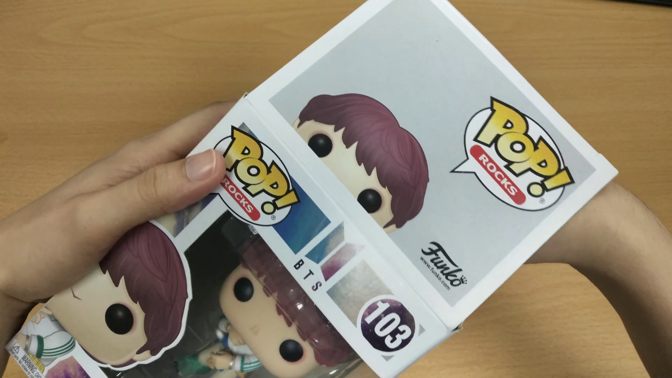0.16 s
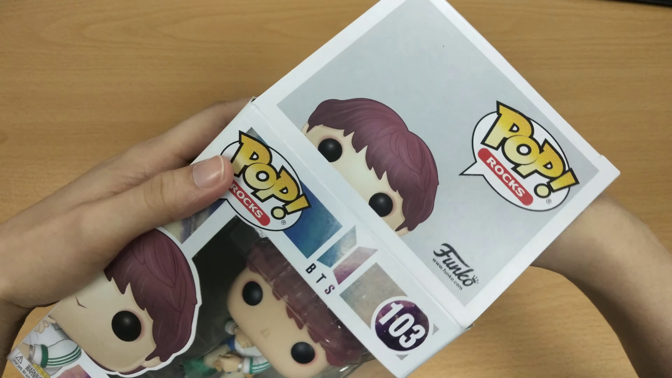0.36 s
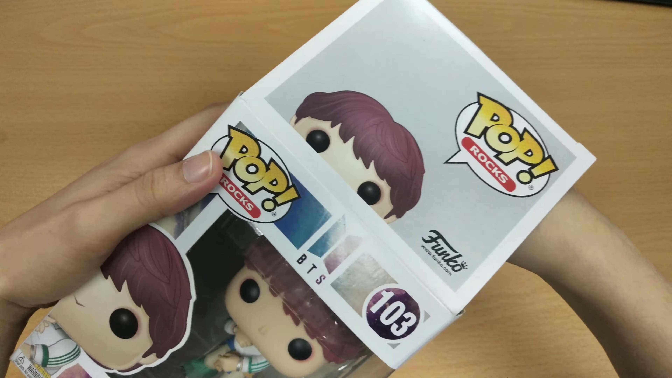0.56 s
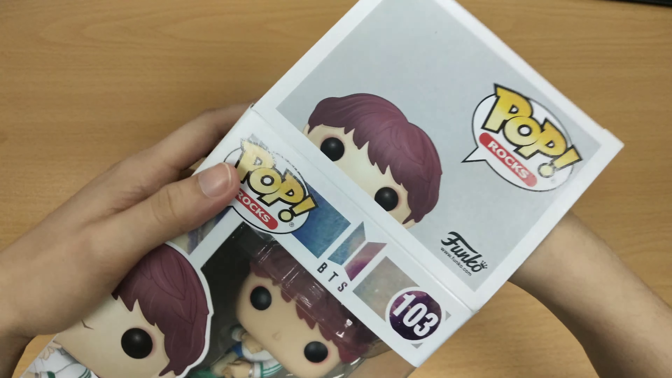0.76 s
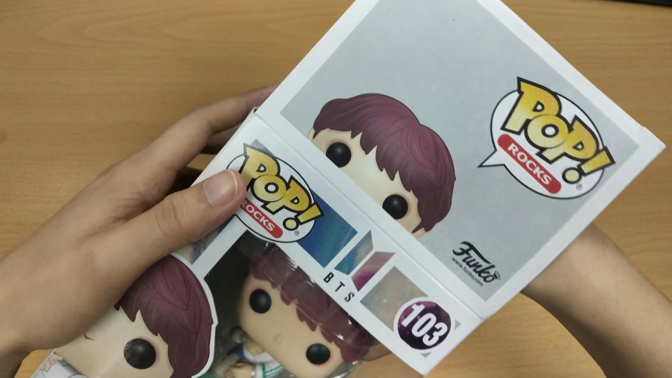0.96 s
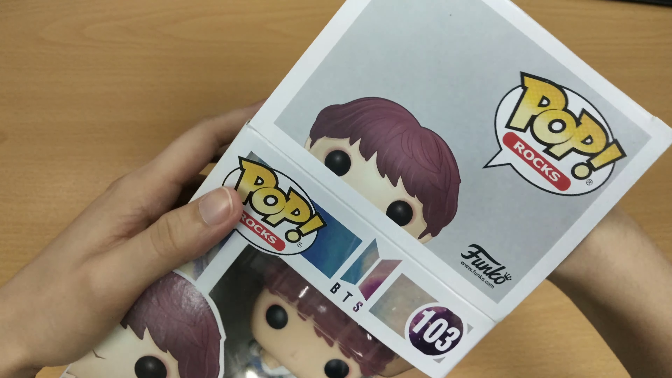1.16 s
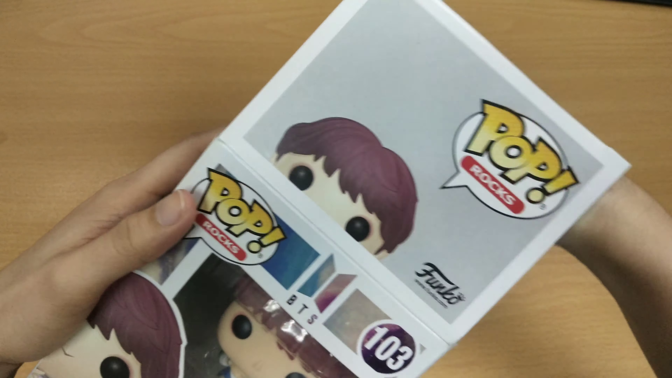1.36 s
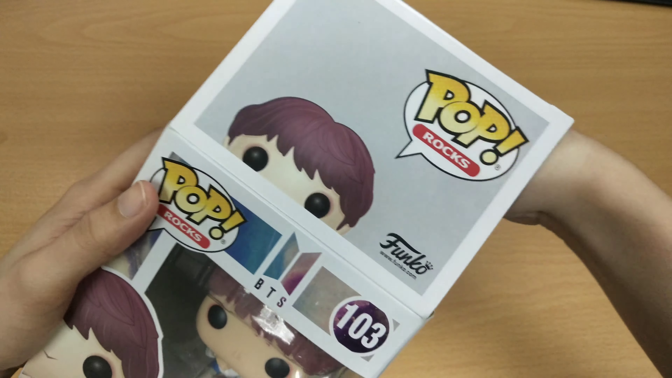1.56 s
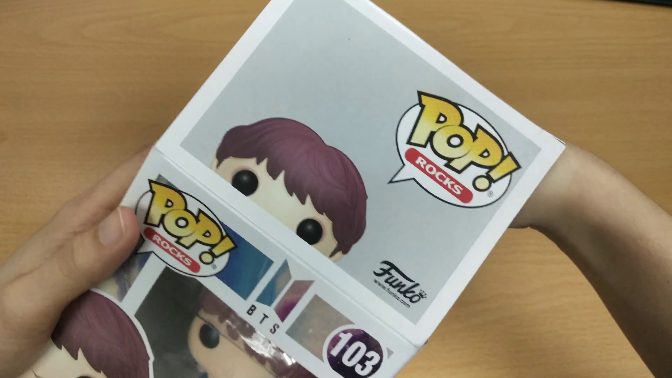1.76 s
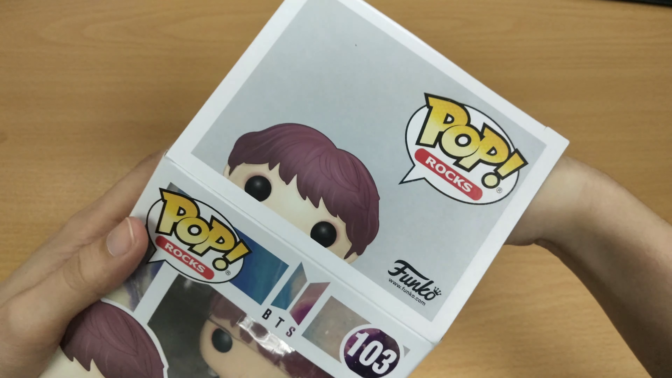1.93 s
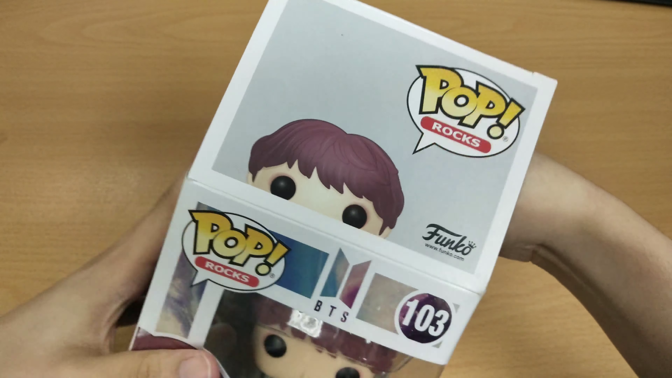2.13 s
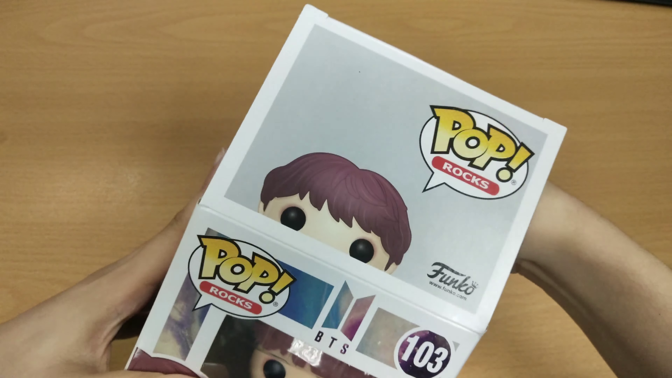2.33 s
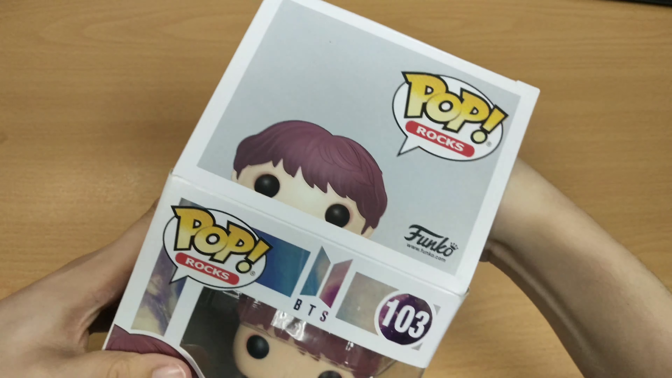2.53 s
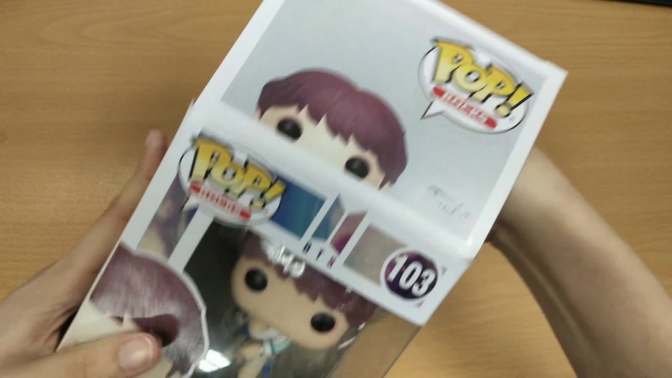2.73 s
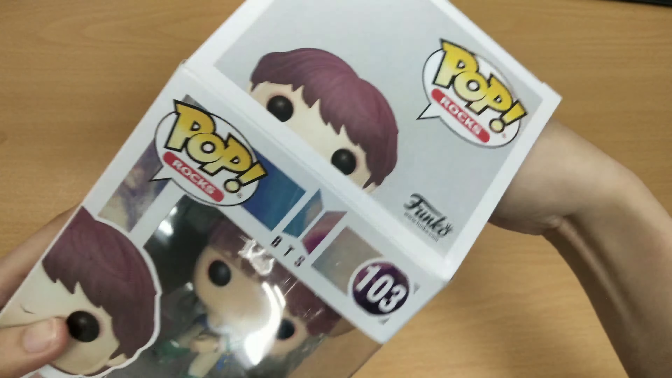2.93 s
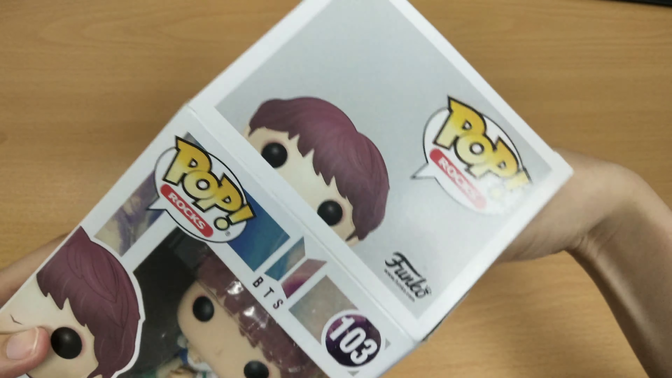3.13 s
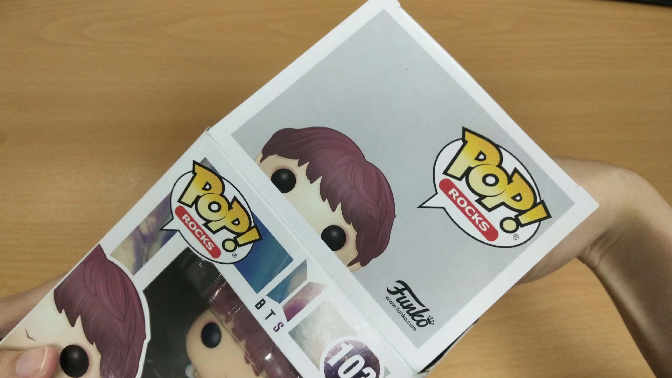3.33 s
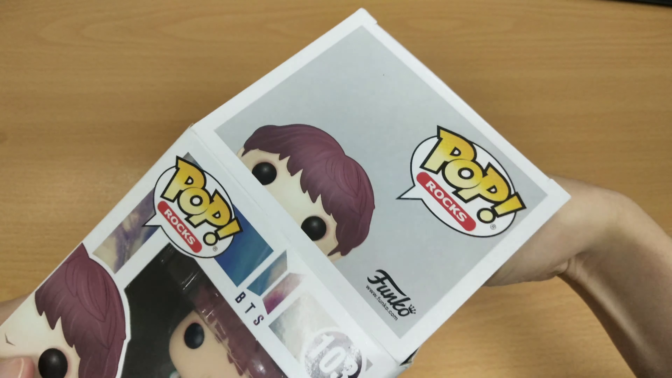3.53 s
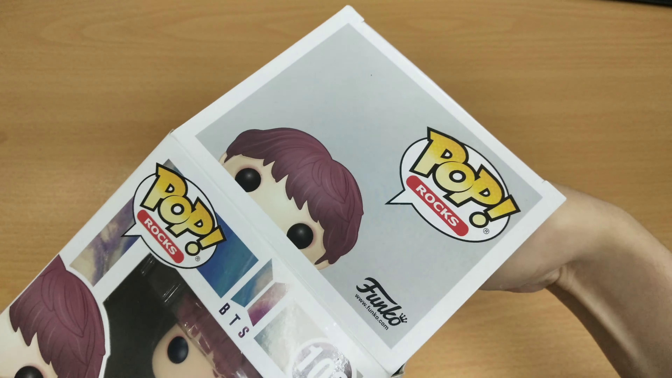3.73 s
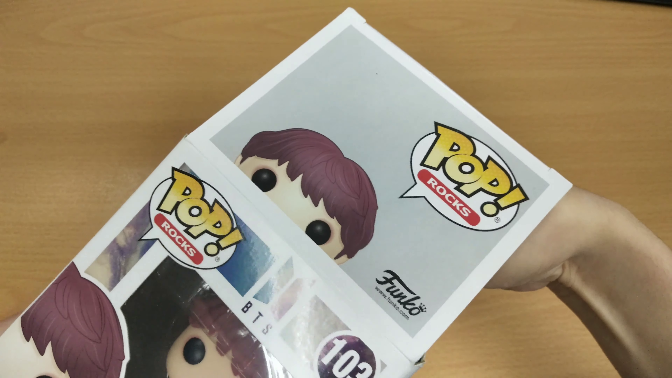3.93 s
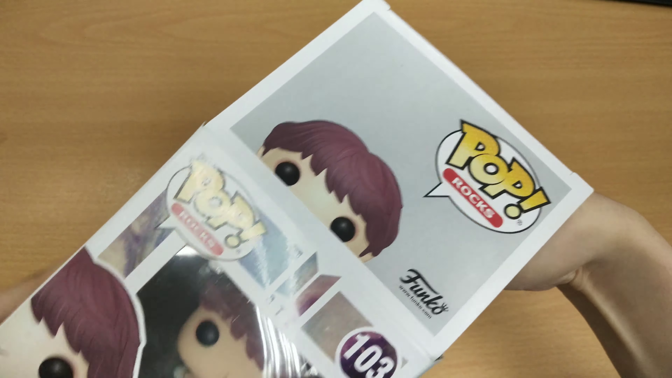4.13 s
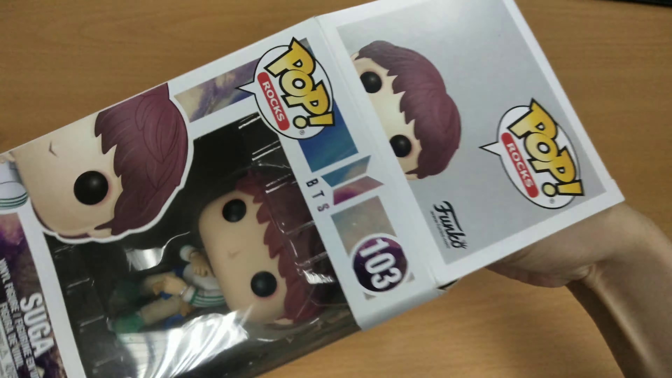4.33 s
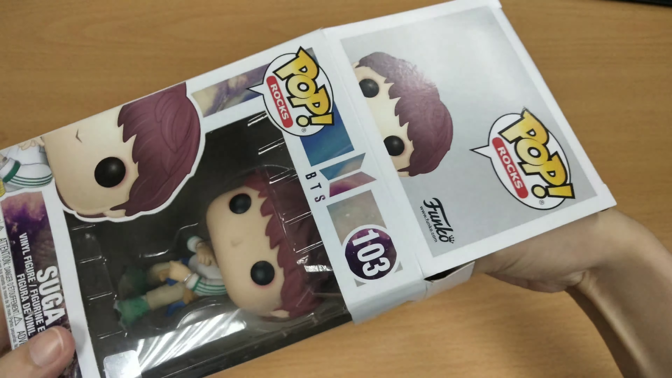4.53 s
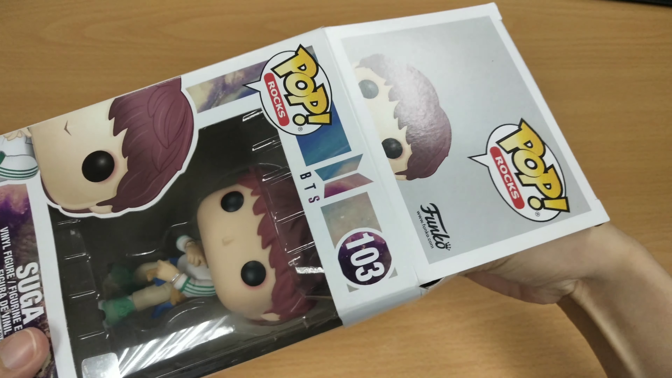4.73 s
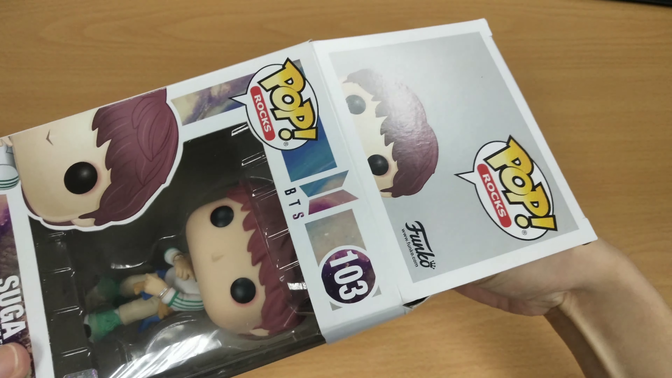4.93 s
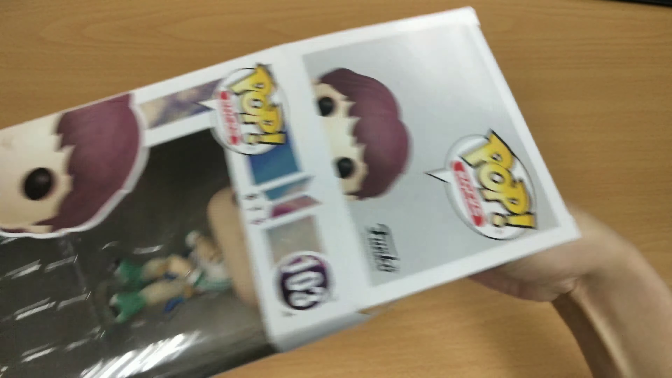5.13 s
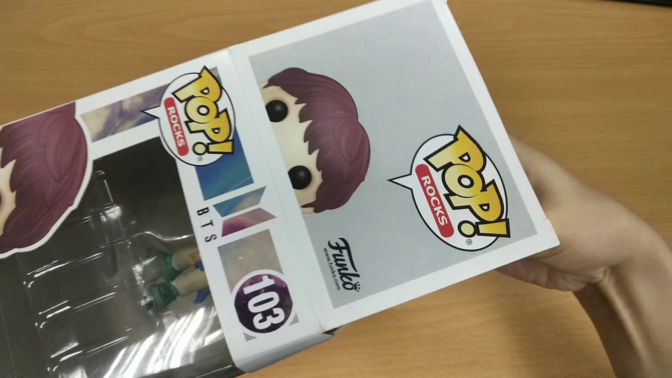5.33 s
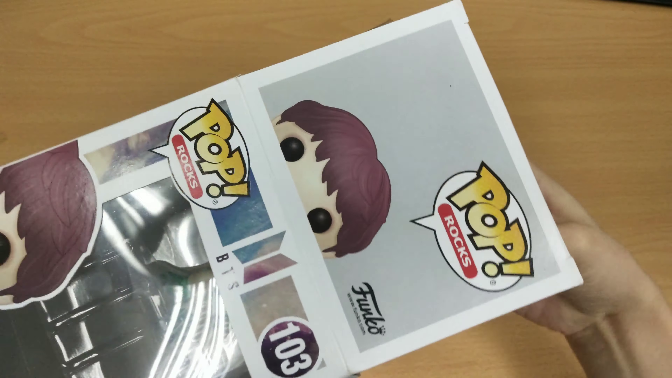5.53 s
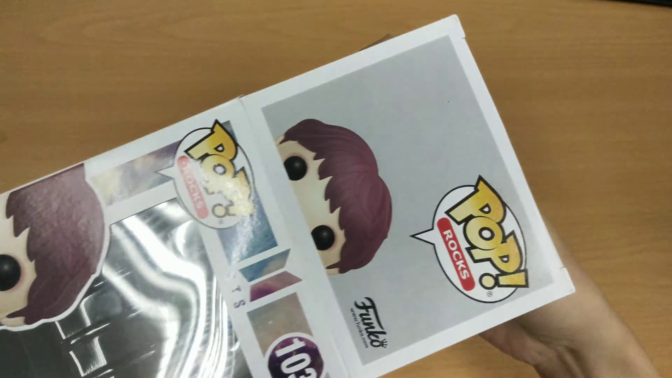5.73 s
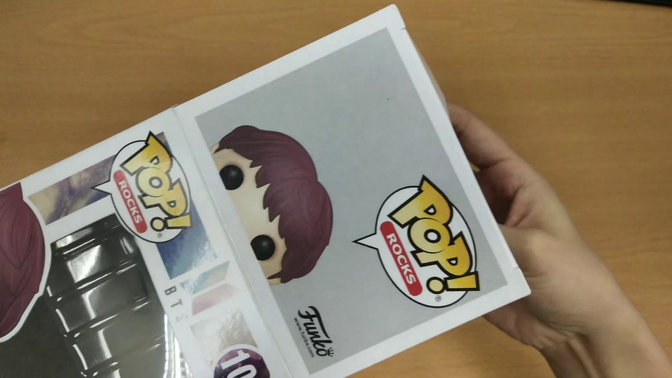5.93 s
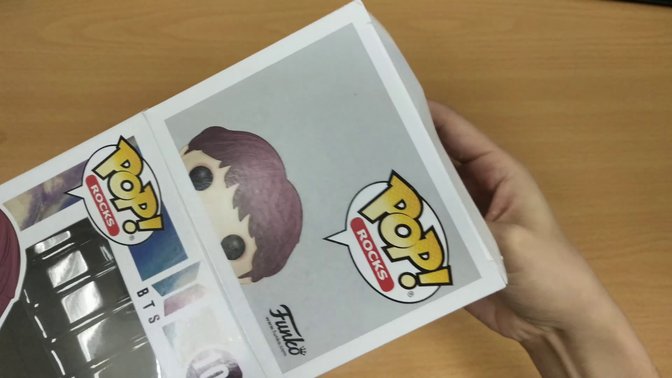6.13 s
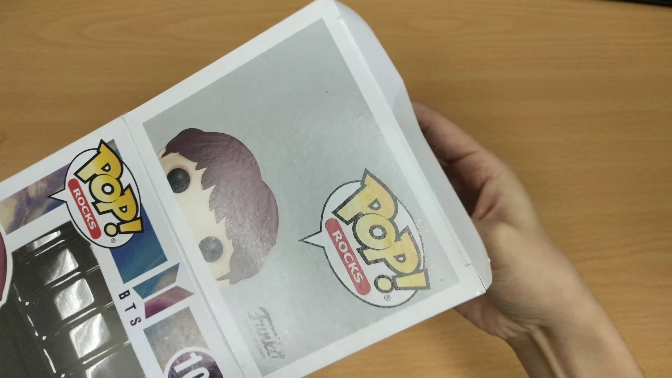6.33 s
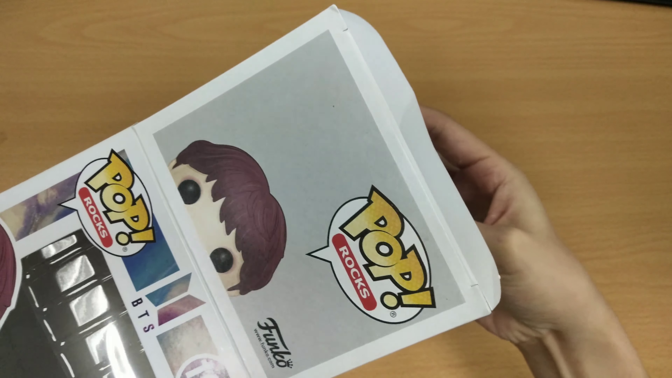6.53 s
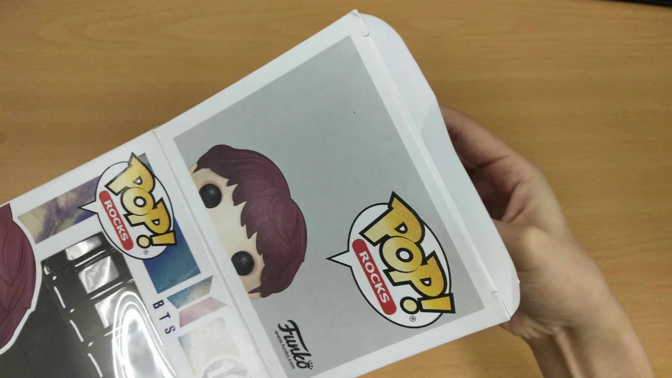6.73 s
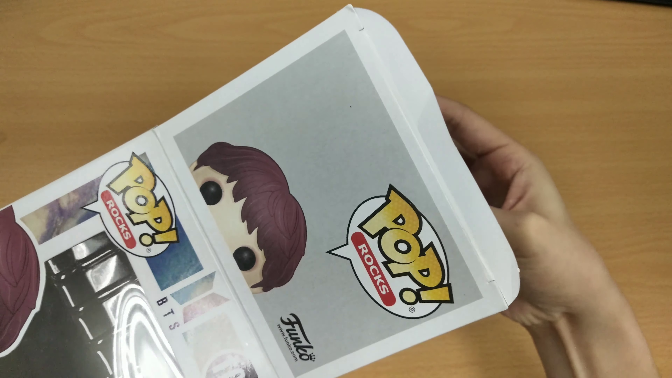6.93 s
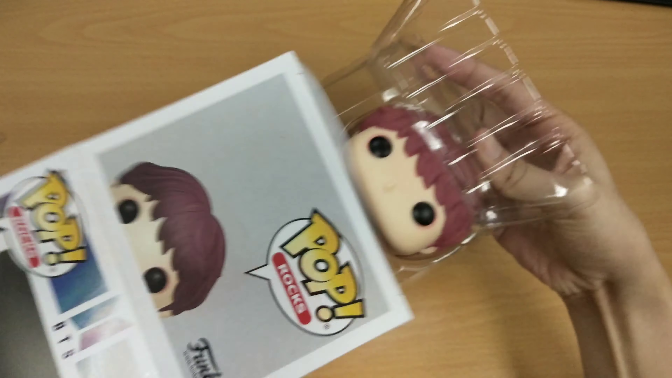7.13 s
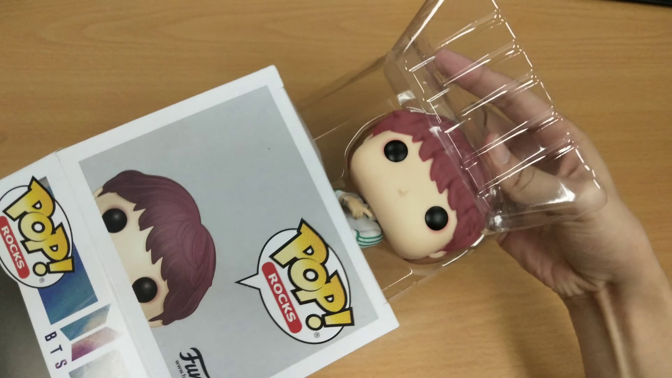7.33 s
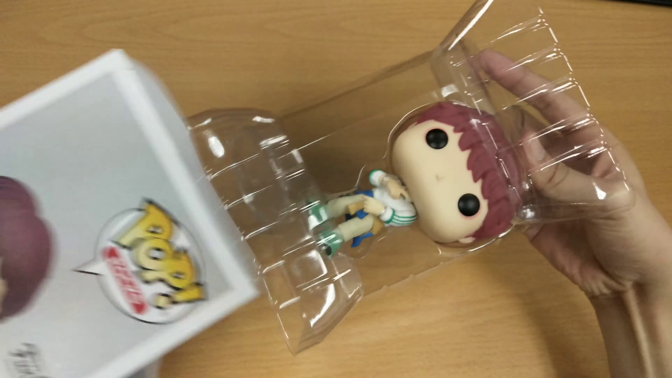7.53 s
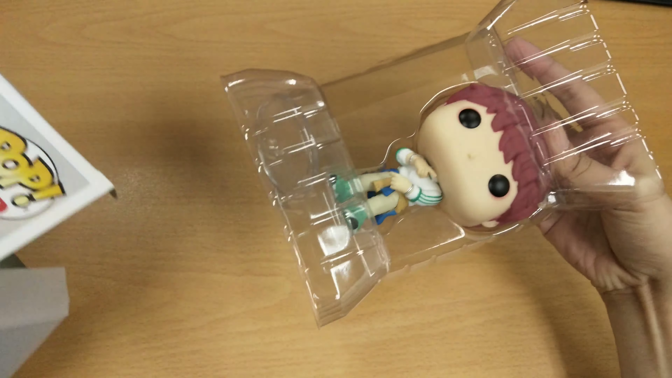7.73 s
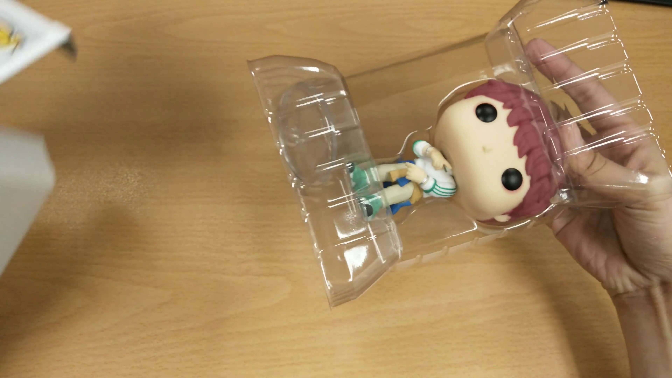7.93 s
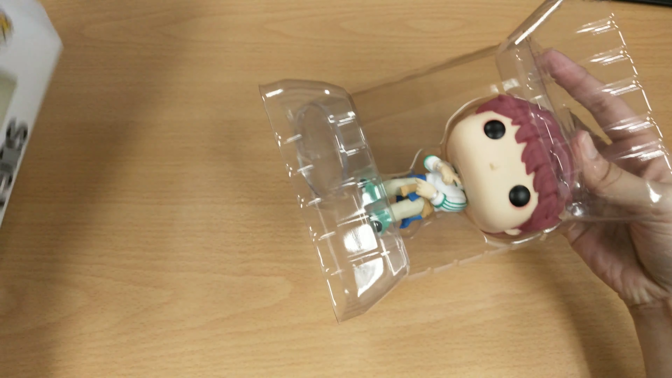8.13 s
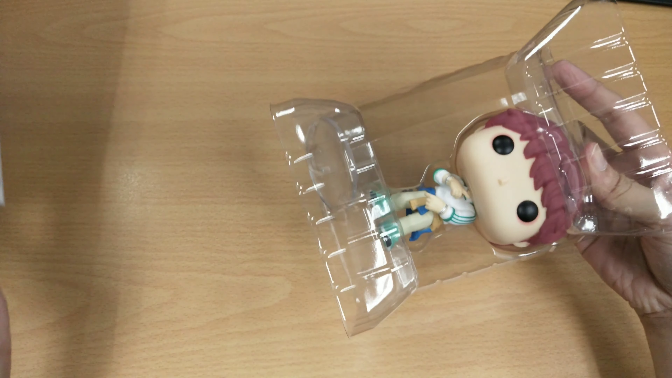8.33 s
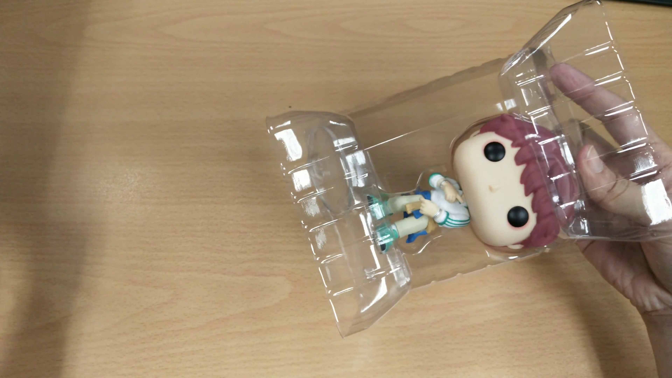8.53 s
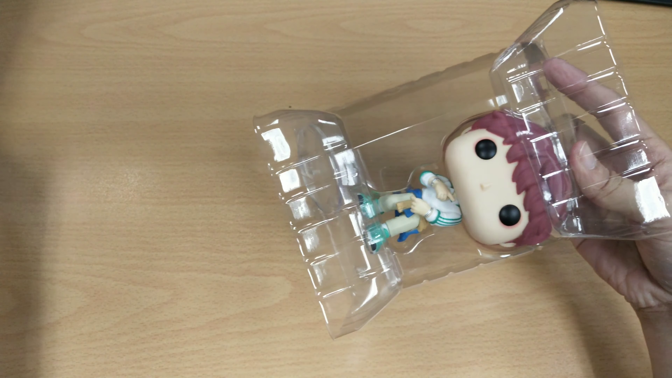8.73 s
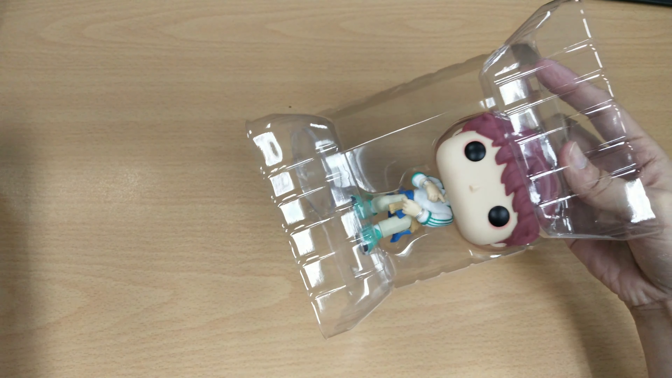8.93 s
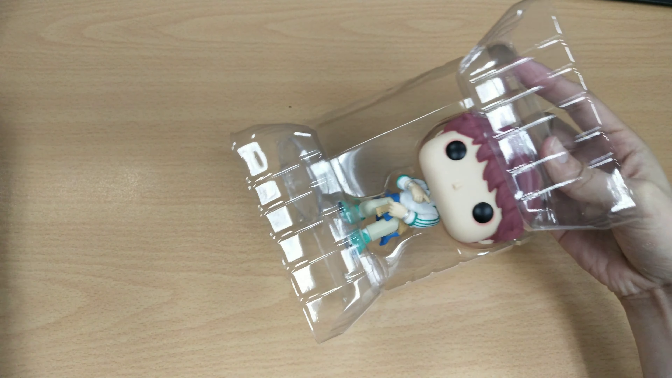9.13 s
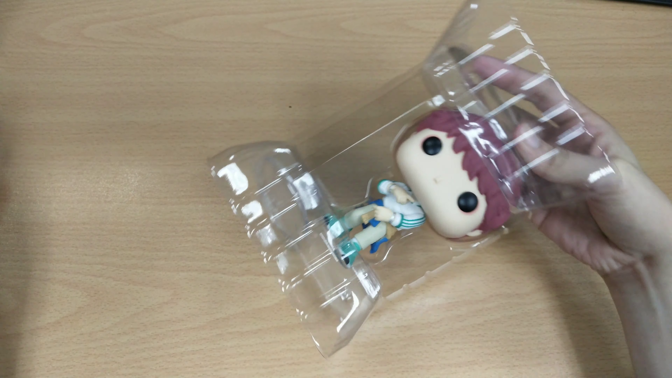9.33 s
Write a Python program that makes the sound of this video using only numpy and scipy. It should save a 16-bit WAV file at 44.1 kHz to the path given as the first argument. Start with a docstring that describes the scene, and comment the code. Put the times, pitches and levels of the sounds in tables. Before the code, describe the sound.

Hands rub and tap a small cardboard box, flap popping open with sharp cracks, then a plastic tray scrapes out over a low hum

```python
"""Opening a cardboard toy box

Hands turn a small card box over a desk, work its lid open and draw out a moulded plastic tray.
Rubs are gritty noise and ringing grains under drawn envelopes; taps, ticks and flap pops are noise bursts
that ring a panel, thump the box and crack. The tray lurches, scrapes out in two pulls and ticks in the hand.
Box, plastic, desk and room colour the handling, over the air of the room and a low hum of filtered noise."""
import sys
import numpy as np
from scipy import signal
from scipy.fft import rfft, irfft, next_fast_len
from scipy.io import wavfile
from scipy.ndimage import uniform_filter1d

SR = 44100
rng = np.random.default_rng(int(sys.argv[2]) if len(sys.argv) > 2 else 0)


def materialize(psi):
    """Save the field psi as 16-bit PCM at rate SR to the path in sys.argv[1].

    A 1-D psi becomes a single channel; in a 2-D psi each row is a channel.
    """
    bounded = np.clip(np.atleast_2d(psi).T, -1, 1)
    quanta = np.round(bounded * 32767).astype(np.int16)
    wavfile.write(sys.argv[1], SR, quanta)


N = 412776
TIME = np.arange(N) / SR


def from_db(db):
    """Decibels to gain."""
    return 10 ** (np.asarray(db) / 20)


def rms_one(x):
    """Scale to unit power."""
    return x / np.sqrt(np.mean(x ** 2) + 1e-20)


def high_pass(x, hz):
    """Causal high-pass."""
    return signal.sosfilt(signal.butter(2, hz, "high", fs=SR, output="sos"), x)


def band(x, low_hz, high_hz):
    """Causal band-pass."""
    edges = [low_hz, min(high_hz, SR / 2 - 10)]
    return signal.sosfilt(signal.butter(2, edges, "band", fs=SR, output="sos"), x)


def resonate(x, hz, width_hz):
    """One resonance, gain about 1 at its top."""
    r = np.exp(-np.pi * width_hz / SR)
    zeros = np.array([1, 0, -1]) * (1 - r * r) / 2
    poles = [1, -2 * r * np.cos(2 * np.pi * hz / SR), r * r]
    return signal.lfilter(zeros, poles, x)


def colour(x, spectrum):
    """Give x a smooth spectrum; unit power."""
    size = next_fast_len(N)
    hz, db = np.transpose(spectrum)
    bins_hz = np.arange(size // 2 + 1) * SR / size
    gain = from_db(np.interp(np.log(bins_hz + 1), np.log(hz), db))
    return rms_one(irfft(rfft(x, size) * gain, size)[..., :N])


def drift(rate):
    """Smooth random wandering of spread 1, with rate new values a second."""
    knots = rng.standard_normal(N // 10)
    return rms_one(np.interp(TIME * rate, np.arange(len(knots)), knots))


def noise_pair(likeness, size):
    """White noise at the two microphones, partly shared."""
    mid, side = rng.standard_normal((2, size))
    alike = np.clip(likeness, -1, 1)
    return (np.sqrt(1 + alike) * mid + np.sqrt(1 - alike) * side * [[1], [-1]]) / np.sqrt(2)


def bells(rows):
    """Sum of short swells, each given as (centre [s], length [s], peak level [dB])."""
    out = np.zeros(N)
    for s, length_s, db in rows:
        near = slice(*np.searchsorted(TIME, [s - length_s, s + length_s]))
        out[near] += from_db(db) * np.exp(-2 * (2 * (TIME[near] - s) / length_s) ** 2)
    return out


def ringing_grains(low_hz, high_hz, per_s, cycles, spread_db, tilt_db):
    """Separate slips, each swelling and ringing at its own pitch; tilt is per octave; unit power."""
    gap, place, size, phase = rng.random((N // 50, 4)).T
    at = (np.cumsum(2 * gap / per_s) * SR).astype(int)
    hz = low_hz * (high_hz / low_hz) ** place
    gain = from_db(spread_db * size + tilt_db * np.log2(hz / low_hz))
    keep, steps = at < N, np.arange(SR // 70)
    turns = hz[keep, None] * steps / SR
    swell = turns * np.exp(-turns / cycles)
    grains = gain[keep, None] * swell * np.sin(2 * np.pi * (turns + phase[keep, None]))
    places = at[keep, None] + steps
    return rms_one(np.bincount(places.ravel(), grains.ravel(), N)[:N])


# the hum's wavering tones: (pitch [Hz], nominal width [Hz], level before stereo balance [dB])
HUM_TONES = [(64.5, 8.3, -59.5), (83.1, 9.3, -47), (104.3, 10.5, -46), (120, 10.6, -46.5)]


def hum():
    """A machine's wavering hum: noise through pairs of narrow resonances, a little louder on the right."""
    tones = np.zeros((2, N))
    for hz, width_hz, db in HUM_TONES:
        once = resonate(noise_pair(0.99, N), hz, 1.36 * width_hz)
        tones += from_db(db) * rms_one(resonate(once, hz, 1.36 * width_hz))
    return tones * from_db([[-.8], [.8]])


# tone colour of the room air: (frequency [Hz], relative level [dB])
AIR_COLOUR = [(25, -14.5), (75, 2), (220, 0.5), (300, -9), (650, -14.5), (1500, -24), (4500, -32),
              (15000, -43)]


def air():
    """Steady air noise, shared more in the bass and diffuse in the treble."""
    mid, side = rng.standard_normal((2, N))
    side = 0.32 * side + 0.77 * high_pass(side, 430)
    noise = from_db(-48) * colour(mid + side * [[1], [-1]], AIR_COLOUR)
    return noise * from_db([[-.4], [.4]])


def stick_slip(depth_db):
    """The fingers catch and let go within milliseconds while the mean pressure holds."""
    grip = from_db(depth_db * (.5 * drift(70) + drift(300)))
    return grip / np.sqrt(uniform_filter1d(grip ** 2, size=SR // 30))


def friction(spectrum, grip, likeness, slips_per_s, slip_db, smooth):
    """Fibres catch and slip: grains of uneven size on a smooth hiss, swelling with the grip."""
    sizes = from_db(slip_db * np.minimum(rng.exponential(1, N), 4))
    slips = (rng.random(N) < slips_per_s / SR) * sizes
    grains = rms_one(uniform_filter1d(slips, size=30))
    return colour(noise_pair(likeness, N) * (grains + smooth) * grip, spectrum)


def moving_fingers(rub, spread_db):
    """As the point of contact moves, it favours now one band of the card and now another."""
    centres = np.geomspace(550, 2600, 7)
    gains = [from_db(spread_db * drift(16)) for _ in centres]
    shifted = rub.copy()
    for hz, gain in zip(centres, gains):
        shifted += resonate(rub, hz, hz / 5) * (gain / np.sqrt(np.mean(gain ** 2)) - 1)
    return shifted


# tone colour of card rubbed by fingers: (frequency [Hz], relative level [dB])
CARD_COLOUR = [(90, -5), (200, 6), (310, 0.5), (550, 7), (1100, 1), (2500, -16.5), (3600, -17.5),
               (8000, -42)]


def card_texture():
    """Rubbed card: fine fibres, coarse ringing grains and crisp crackle."""
    grip = stick_slip(depth_db=2.8)
    fibres = friction(CARD_COLOUR, grip, likeness=0.79, slips_per_s=600, slip_db=2.0, smooth=0.65)
    fine = moving_fingers(fibres, spread_db=2.5)
    coarse = ringing_grains(low_hz=720, high_hz=2400, per_s=260, cycles=1.8, spread_db=13, tilt_db=-2.0)
    crackle = ringing_grains(low_hz=1500, high_hz=4500, per_s=190, cycles=0.8, spread_db=12, tilt_db=-1.5)
    return from_db(-3.5) * fine + from_db(-6) * coarse + from_db(-11.5) * crackle


# tone colour of hissing edges: (frequency [Hz], relative level [dB])
EDGE_COLOUR = [(1200, 0.5), (2800, 5), (7500, -3), (10000, -5), (15000, -9)]


def edge_texture():
    """Bright, wide friction hiss of the edges."""
    return friction(EDGE_COLOUR, 1, likeness=0.116, slips_per_s=900, slip_db=5.5, smooth=0.9)


HOLD_RUB_DB, HOLD_HISS_DB, BOX_AWAY_S = -57.5, -72.5, 7.82
HOLD_SWING_DB, HOLD_SHIFTS_PER_S = 4, 37


def holding():
    """Hands never quite still: faint rub and hiss that come and go until the box is put aside."""
    restless = from_db(HOLD_SWING_DB * drift(HOLD_SHIFTS_PER_S))
    return from_db([[HOLD_RUB_DB], [HOLD_HISS_DB]]) * restless * (TIME < BOX_AWAY_S)


SLIDE_ATTACK_SHARE, SLIDE_RELEASE_S = 0.29, 0.011   # attack is a share of the slide's length
# card and plastic slide over each other:
# (start [s], length [s], rubbing drive [dB], hiss drive [dB])
SLIDE_MOVES = [(0.0, 0.14, -52.5, -59.5), (2.748, 0.67, -52, -56), (4.345, 0.06, -53, -40.5),
               (4.764, 0.098, -47, -55.5), (4.953, 0.15, -45, -50), (5.251, 0.025, -33.5, -32),
               (5.425, 0.2, -49, -60), (5.933, 0.13, -37.5, -41.5), (6.258, 0.065, -41.5, -44.5),
               (6.388, 0.038, -39, -48.5), (6.478, 0.033, -46, -32.5), (6.648, 0.059, -44, -51.5),
               (6.847, 0.066, -39.5, -47), (7.971, 0.28, -65, -56.5), (8.97, 0.34, -70, -51)]


def slides():
    """Each slide gets going, holds and dies away; the longer it is, the more gently it starts."""
    out = np.zeros((2, N))
    for s, length_s, rub_db, hiss_db in SLIDE_MOVES:
        attack = np.sqrt(np.clip((TIME - s) / (SLIDE_ATTACK_SHARE * length_s), 0, 1))
        release = np.exp(-np.clip((TIME - s - length_s) / SLIDE_RELEASE_S, 0, 20))
        out += from_db([[rub_db], [hiss_db]]) * attack * release
    return out


TICK_THUD_DB, TICK_CRACK_DB = 0.5, -10.5   # relative to the tick's panel
TICK_PITCH_HZ, TICK_PITCH_OCTAVES = 1150, 0.28   # middle pitch and largest random shift either way
# fingertips and tray catch on the card: (time [s], panel drive [dB])
SOFT_TICKS = [(0.14, -48.5), (0.185, -42.5), (0.21, -48), (0.229, -54), (0.395, -49), (0.555, -51),
              (0.604, -50.5), (0.648, -51.5), (1.021, -42), (1.293, -42.5), (1.812, -44), (1.898, -44.5),
              (2.436, -43.5), (2.641, -47.5), (3.042, -41), (3.575, -44.5), (3.94, -46.5), (4.06, -45.5),
              (4.326, -39.5), (4.515, -42.5), (4.76, -45.5), (5.146, -43.5), (5.332, -32), (5.375, -35),
              (5.456, -41.5), (5.565, -45.5), (5.648, -45.5), (5.948, -40.5), (5.967, -38), (6.94, -48),
              (7.146, -39.5), (7.632, -38), (7.679, -44), (7.757, -49)]


def ticks():
    """Soft ticks as snap rows; each touch lands on another patch of card, higher or lower."""
    pitches = TICK_PITCH_HZ * 2 ** (TICK_PITCH_OCTAVES * (2 * rng.random(len(SOFT_TICKS)) - 1))
    return [(s, db, db + TICK_THUD_DB, db + TICK_CRACK_DB, hz) for (s, db), hz in zip(SOFT_TICKS, pitches)]


SCUFF_HISS_DB = -12.5   # relative to the scuff's rubbing
# a fingertip shifts its grip: (centre [s], length [s], rubbing drive [dB])
FINGER_SCUFFS = [(0.232, 0.16, -49), (0.6, 0.13, -54), (0.808, 0.063, -46), (1.11, 0.042, -43),
                 (1.316, 0.036, -36), (1.428, 0.055, -38.5), (1.548, 0.04, -41), (1.586, 0.041, -38),
                 (1.688, 0.098, -40), (1.997, 0.099, -40.5), (2.175, 0.089, -36), (2.43, 0.049, -43),
                 (2.692, 0.025, -35), (3.012, 0.047, -34.5), (3.1, 0.055, -35.5), (3.655, 0.034, -38),
                 (3.976, 0.047, -43), (5.233, 0.055, -40.5)]


def scuffs():
    """Each scuff is a swell of rubbing, with hiss in proportion."""
    rub = bells(FINGER_SCUFFS)
    return np.array([rub, from_db(SCUFF_HISS_DB) * rub])


STRAIN_S, STRAIN_RUB_DB, STRAIN_HISS_DB = 0.0033, -12, -2   # levels relative to the snap's panel and crack
# taps and snaps of card and tray, drives set over each hit's first 8 ms, before box and plastic:
# (time [s], panel drive [dB], thud drive [dB], crack drive [dB], panel pitch [Hz])
CARD_SNAPS = [(1.0444, -37.5, -42, -48, 960), (2.7271, -24.5, -39, -26, 856),
              (2.956, -33.5, -32.5, -47, 1280), (3.443, -32, -39.5, -43.5, 970),
              (4.0793, -41, -40.5, -48, 1360), (4.3468, -36, -37, -34, 1290),
              (4.356, -29.5, -30, -32, 1480), (4.3659, -28.5, -34, -31, 1480),
              (4.3943, -35, -45, -41, 1110), (4.534, -34, -40, -32.5, 1240),
              (4.6801, -36.5, -41.5, -41.5, 960), (5.2755, -17.5, -28, -19.5, 1210),
              (5.2866, -24, -20.5, -17, 1500), (5.2943, -24.5, -35, -26, 2130),
              (5.7883, -26, -34, -57, 1060), (6.0526, -35, -33, -44, 940), (6.3004, -28.5, -50, -32, 1430),
              (6.409, -35.5, -53, -38.5, 2260), (6.5125, -22.5, -28.5, -44, 714),
              (6.6757, -34.5, -58, -54, 1140), (6.7837, -27.5, -45, -43.5, 970),
              (6.8302, -34, -39, -48, 1170), (6.8952, -24, -48, -29.5, 1010), (7.1118, -33, -44, -51, 1230),
              (7.2002, -27.5, -43, -51, 1390), (7.2047, -29, -40, -24.5, 1560),
              (7.2161, -12.5, -25, -22.5, 1560), (7.2998, -23, -19, -47, 1760),
              (7.3054, -26, -30.5, -30.5, 1250), (7.412, -34.5, -31.5, -71, 1260),
              (7.5767, -20.5, -27, -24, 1130), (7.5826, -20.5, -22.5, -32, 1130),
              (7.5949, -22, -41, -28, 1170), (7.6947, -30.5, -37, -43, 1300)]


def strain():
    """The card creeps just before it gives: rubbing builds up to each snap and ends with it."""
    out, t = np.zeros((2, N)), np.arange(-SR // 20, 0) / SR
    for s, panel_db, _, crack_db, _ in CARD_SNAPS:
        at = round(s * SR)
        levels = from_db([[panel_db + STRAIN_RUB_DB], [crack_db + STRAIN_HISS_DB]])
        out[:, at - len(t):at] += levels * np.exp(t / STRAIN_S)
    return out


def snap_force(t, likeness, rise_s, fall_s, rattle_db, rattle_s):
    """A quick run of tiny slips that swells and ends, then the weaker flutter of the loosened sheet."""
    onset = 1 - np.exp(-(t / rise_s) ** 2)
    burst = np.exp(-(t / fall_s) ** 2)
    flutter = from_db(rattle_db) * np.exp(-t / rattle_s)
    return noise_pair(likeness, len(t)) * onset * (burst + flutter)


def panel_ring(t, pitch_hz):
    """The force of a snap rings one patch of panel."""
    force = snap_force(t, likeness=0.56, rise_s=0.00098, fall_s=0.0048, rattle_db=-6.5, rattle_s=0.013)
    force[:, SR // 900] += 11   # the sheet buckles: a single impulse about 1 ms in
    return resonate(force, pitch_hz, width_hz=360) + 0.14 * band(force, 670, 2640)


def box_thud(t):
    """The hollow box gives a low thump."""
    force = snap_force(t, likeness=0.85, rise_s=0.0019, fall_s=0.0052, rattle_db=-6.0, rattle_s=0.019)
    return band(force, 296, 820)


def edge_crack(t):
    """The edge cracks, strongest in the low treble; no two creases ring at the same few pitches."""
    force = snap_force(t, likeness=0.12, rise_s=0.0013, fall_s=0.0029, rattle_db=-12.5, rattle_s=0.0096)
    crack = band(force, 1800, 21400)
    crack = crack + 3.4 * resonate(crack, 1830, width_hz=4700)
    return crack + sum(resonate(crack, hz, 260) for hz in rng.uniform(5000, 8300, 4))


def snaps():
    """Every snap, click and tick rings a panel, thumps the box and cracks; returns card and crack."""
    t = np.arange(SR // 8) / SR
    head = SR // 125   # 8 ms
    card, edge = np.zeros((2, 2, N + len(t)))
    for s, panel_db, thud_db, crack_db, pitch_hz in CARD_SNAPS + clicks() + ticks():
        panel, thud, crack = panel_ring(t, pitch_hz), box_thud(t), edge_crack(t)
        at = round(s * SR)
        for out, part, db in ((card, panel, panel_db), (card, thud, thud_db), (edge, crack, crack_db)):
            out[:, at:at + len(t)] += part * from_db(db) / np.sqrt(np.mean(part[:, :head] ** 2))
    return card[:, :N], edge[:, :N]


# the stiff plastic edge rasps over the card: (centre [s], length [s], drive [dB])
EDGE_RASPS = [(1.55, 0.023, -45), (1.587, 0.023, -46), (1.69, 0.06, -48.5), (3.185, 0.04, -49.5),
              (5.49, 0.15, -53), (6.0, 0.2, -45), (7.52, 0.31, -45), (7.735, 0.05, -47)]


def rasps():
    """A plastic edge skips over the card in bright, creaking grains."""
    grains = ringing_grains(low_hz=1410, high_hz=3200, per_s=450, cycles=3.2, spread_db=9, tilt_db=-3.0)
    return bells(EDGE_RASPS) * grains


CLICK_PANEL_DB, CLICK_THUD_DB, CLICK_PITCH_HZ = -1, -7.5, 1160   # levels relative to the click's crack
# light clicks of the plastic window and tray: (time [s], crack drive [dB])
PLASTIC_CLICKS = [(2.3116, -38), (2.5097, -46), (3.245, -49.5), (5.017, -45.5), (5.0488, -45.5),
                  (5.072, -43.5), (5.228, -42.5), (5.354, -39), (5.495, -53), (5.528, -49.5), (6.111, -49),
                  (6.152, -45.5), (6.216, -45), (6.482, -39), (6.4998, -42), (6.774, -45), (6.859, -45),
                  (6.88, -38), (8.0274, -39.5), (8.2567, -43), (8.318, -38.5), (8.33, -43), (8.633, -51.5)]


def clicks():
    """Light clicks as snap rows; all stir the panel and the box in the same proportion."""
    return [(s, db + CLICK_PANEL_DB, db + CLICK_THUD_DB, db, CLICK_PITCH_HZ) for s, db in PLASTIC_CLICKS]


SQUEAK_JITTER = 0.018   # spread of the pitch wobble, as a share of the pitch
# an edge sticks and slips fast enough to squeak:
# (start [s], length [s], first pitch [Hz], last pitch [Hz], drive [dB], octave above, relative [dB])
EDGE_SQUEAKS = [(3.443, 0.007, 3360, 3160, -31, -15.5), (6.3013, 0.0066, 1450, 1400, -18.5, -9),
                (6.479, 0.012, 3270, 2780, -36, -22), (7.177, 0.019, 3700, 2650, -31.5, -2)]


def squeaks():
    """Short, unsteady tones with an octave above; the pitch sags ever faster as the edge slows."""
    out, wobble = np.zeros(N), 1 + SQUEAK_JITTER * drift(600)
    for s, length_s, first_hz, last_hz, db, octave_db in EDGE_SQUEAKS:
        near = (TIME > s) & (TIME < s + length_s)
        progress = (TIME[near] - s) / length_s
        hz = (first_hz + (last_hz - first_hz) * progress ** 2) * wobble[near]
        phase = 2 * np.pi * np.cumsum(hz) / SR
        tone = np.sin(phase) + from_db(octave_db) * np.sin(2 * phase)
        out[near] += from_db(db) * np.sin(np.pi * progress) * tone
    return out


# the flap springs free or the tray jumps a catch:
# (time [s], pitch [Hz], envelope peak before the box [dB], swell [s])
CATCH_KNOCKS = [(5.2761, 1670, -5.5, 0.00044), (6.512, 410, -16.5, 0.0017), (7.2167, 1650, -3, .0012),
                (7.2388, 1420, -13, 0.001), (7.272, 2300, -26, 0.00088), (7.2838, 950, -21, .0006),
                (7.3001, 1780, -3.5, 0.00025)]


def knocks():
    """Each pitched knock is a few cycles that swell and die quickly."""
    out, t = np.zeros(N), np.arange(SR // 20) / SR
    for s, hz, db, swell_s in CATCH_KNOCKS:
        at = round(s * SR)
        swell = t / swell_s * np.exp(1 - t / swell_s)
        out[at:at + len(t)] += from_db(db) * swell * np.sin(2 * np.pi * hz * t)
    return out


LURCH_S, LURCH_HOLD_S, LURCH_RUB_DB, LURCH_HISS_DB = 5.28, 0.026, -28, -24
LURCH_RISE_DB_PER_S, RUB_FALL_DB_PER_S, HISS_FALL_DB_PER_S = 1391, 123, 185


def lurch():
    """The tray runs down the box and slows to rest: a steep rise, then hiss dies faster than rubbing."""
    rise_db = LURCH_RISE_DB_PER_S * np.clip(TIME - LURCH_S, -1, 0)
    slowing_s = np.clip(TIME - LURCH_S - LURCH_HOLD_S, 0, 2)
    return from_db([LURCH_RUB_DB + rise_db - RUB_FALL_DB_PER_S * slowing_s,
                    LURCH_HISS_DB + rise_db - HISS_FALL_DB_PER_S * slowing_s])


# the tray is drawn out in two pulls: (time [s], rubbing drive [dB], hiss drive [dB])
TRAY_PULL = [(7.06, -79, -74), (7.099, -39, -45), (7.19, -42.5, -49), (7.225, -29, -34),
             (7.315, -25, -35.5), (7.37, -42.5, -50.5), (7.45, -41.5, -61), (7.555, -34, -47),
             (7.58, -27, -35), (7.64, -52, -57), (7.75, -39, -48.5), (7.84, -70, -98)]


def pull():
    """The tray scrapes along the walls on its way out."""
    s, *levels = np.transpose(TRAY_PULL)
    return from_db([np.interp(TIME, s, db) for db in levels]) * (TIME > s[0]) * (TIME < s[-1])


# tray and figure bump about: (centre [s], length [s], drive [dB])
DULL_BUMPS = [(7.215, 0.059, -31), (7.308, 0.027, -37), (7.59, 0.028, -29), (8.795, 0.034, -42),
              (9.266, 0.014, -42)]


def bumps():
    """The whole box shudders with a low, dull thump."""
    return bells(DULL_BUMPS) * rms_one(band(rng.standard_normal(N), 125, 500))


JUDDER_DB, JUDDERS_PER_S = 1.5, 70   # slides and pulls move in small jerks


def contact():
    """Strength of rubbing and of hiss: all movements add in power; the rubbing judders more."""
    jerks = rms_one(from_db(JUDDER_DB * drift(JUDDERS_PER_S)))
    judder = np.array([jerks, np.sqrt(jerks)])
    moves = holding(), scuffs(), strain(), judder * slides(), lurch(), judder * pull()
    return np.sqrt(sum(move ** 2 for move in moves))


# resonances of the box: (pitch [Hz], width [Hz], gain relative to the direct force [dB])
BOX_RINGS = [(378, 39, -4.5), (580.4, 28, 2.5), (955, 77, -4.5), (1174, 160, 0), (1520, 54, -41),
             (2315, 270, -6.5)]


def box(force):
    """The hollow box adds its resonances; the right microphone hears it a little earlier and louder."""
    sound = 0.77 * (force + sum(from_db(db) * resonate(force, hz, width) for hz, width, db in BOX_RINGS))
    left = np.interp(TIME - .00008, TIME, sound[0])
    return np.array([left, sound[1]]) * from_db([[-.5], [.5]])


# ringing of the thin plastic: (pitch [Hz], gain relative to the direct force [dB])
PLASTIC_RINGS = [(5050, -10), (5490, -17), (5975, -15.5), (6405, -12), (6880, -11.5), (7610, -34)]


def plastic(force):
    """Window and tray add their short, bright rings."""
    return 0.66 * (force + sum(from_db(db) * resonate(force, hz, width_hz=88) for hz, db in PLASTIC_RINGS))


# close echoes from desk top and box walls: (delay at the left [s], delay at the right [s])
CLOSE_ECHOES = [(.00135, 0.001492), (.0033, .0041)]


def desk(x, echo_db):
    """The desk top and the box walls return a few close, bright echoes, later on the right."""
    bright = band(x, 1170, SR / 2)
    echoes = np.zeros((2, N))
    for delays in CLOSE_ECHOES:
        echoes += np.array([np.interp(TIME - s, TIME, side) for s, side in zip(delays, bright)])
    return x + from_db(echo_db) * echoes


LOW_T60_S, HIGH_T60_S = 0.37, 0.41   # time for each band of the tail to fall 60 dB


def room(x):
    """A diffuse tail of fading noise, different at each microphone, in a low and a high band."""
    t = np.arange(SR // 2) / SR
    white = noise_pair(0.35, len(t)) * (1 - np.exp(-(t / 0.0016) ** 2))
    low = band(white, 127, 2630) * from_db(-60 * t / LOW_T60_S)
    high = band(white, 1540, 15000) * from_db(-1.5 - 60 * t / HIGH_T60_S)
    response = low + high
    response = response / np.sqrt(np.sum(response ** 2) / 2)
    return from_db(-17.5) * signal.fftconvolve(x, response, axes=1)[:, :N]


def scene():
    """Snaps and sliding share one box, one tray and one room."""
    rubbing, hissing = contact()
    rub = rubbing * card_texture()
    hiss = hissing * edge_texture()
    card, crack = snaps()
    box_sound = box(card + rub + rasps() + squeaks() + knocks() + bumps())
    handling = desk(box_sound + plastic(crack + hiss), echo_db=-14.5)
    return handling + room(handling) + hum() + air()


def record(dry):
    """The microphone ports ring in the treble, the hardest peaks are rounded and the top is cut."""
    bright = dry + 1.17 * resonate(dry, 7220, width_hz=1140)
    rounded = bright / (1 + (bright / .8) ** 4) ** .25
    return signal.sosfilt(signal.ellip(10, .2, 80, 15700, fs=SR, output="sos"), rounded)


dry = scene()
out = record(dry)
materialize(out)
```